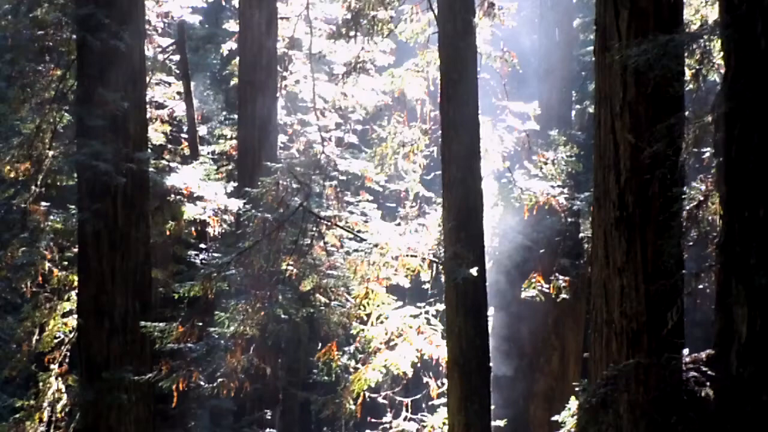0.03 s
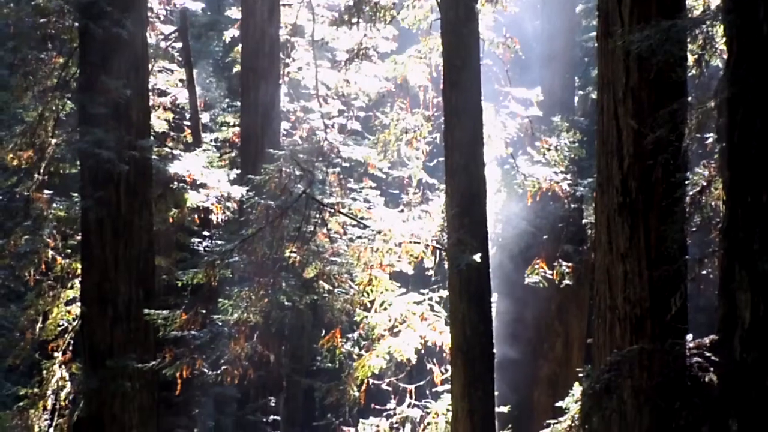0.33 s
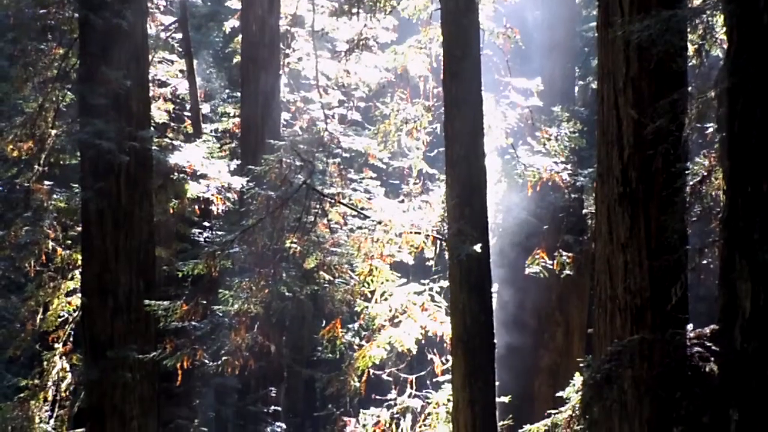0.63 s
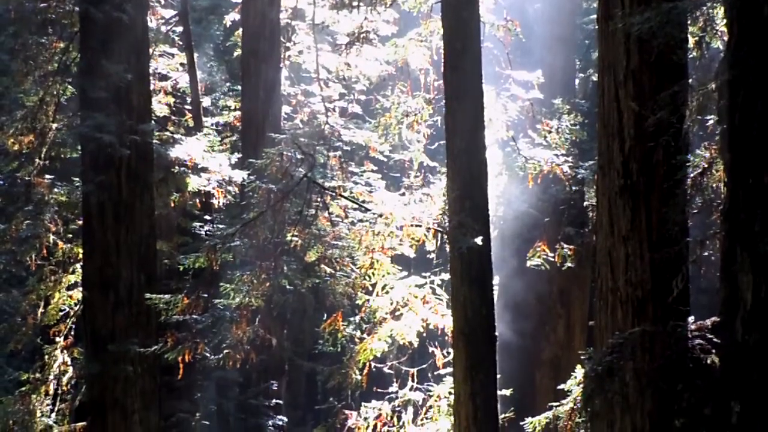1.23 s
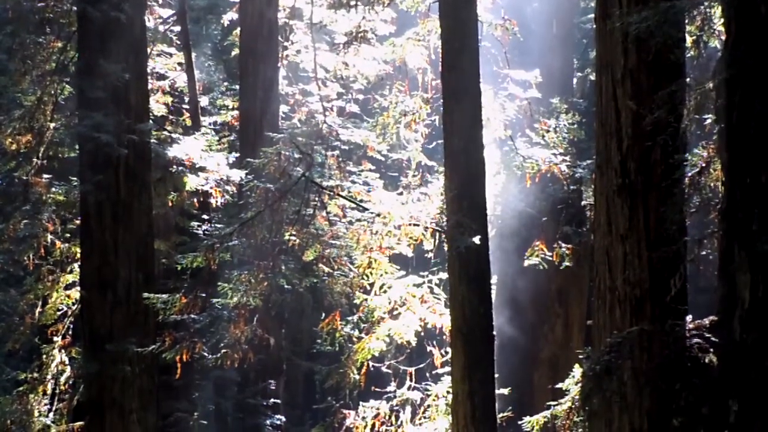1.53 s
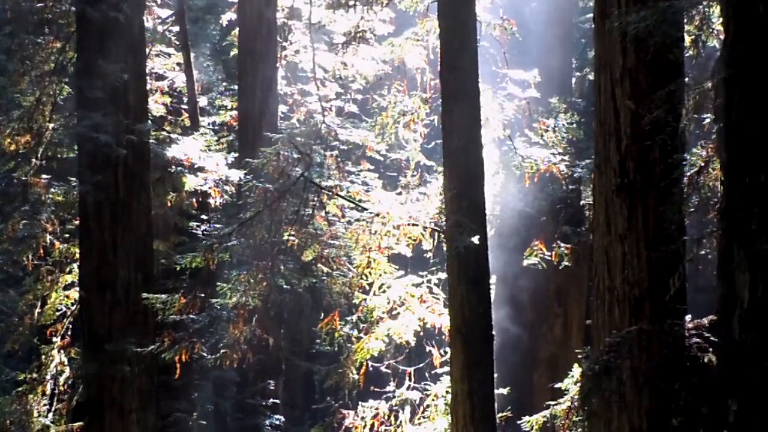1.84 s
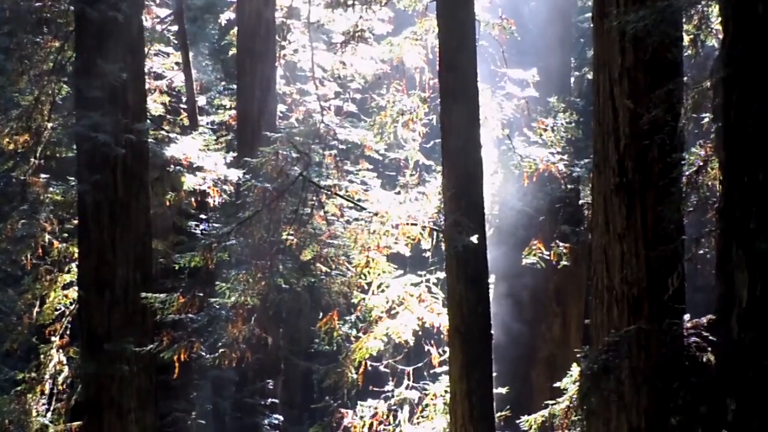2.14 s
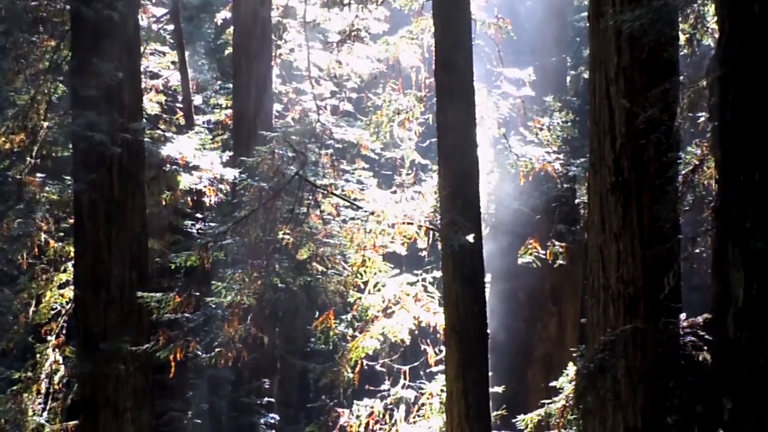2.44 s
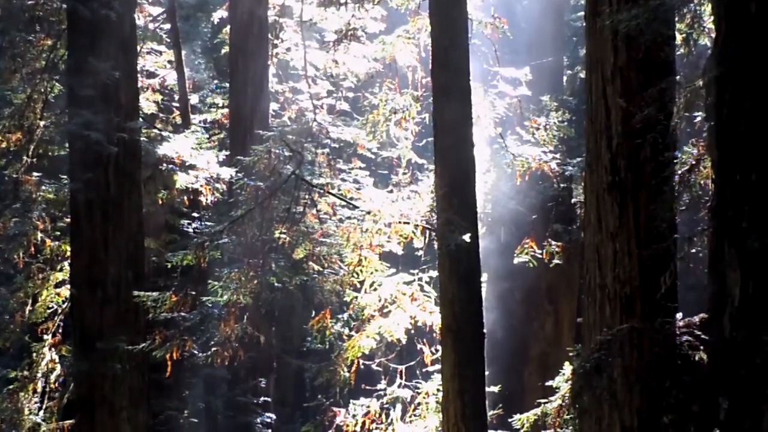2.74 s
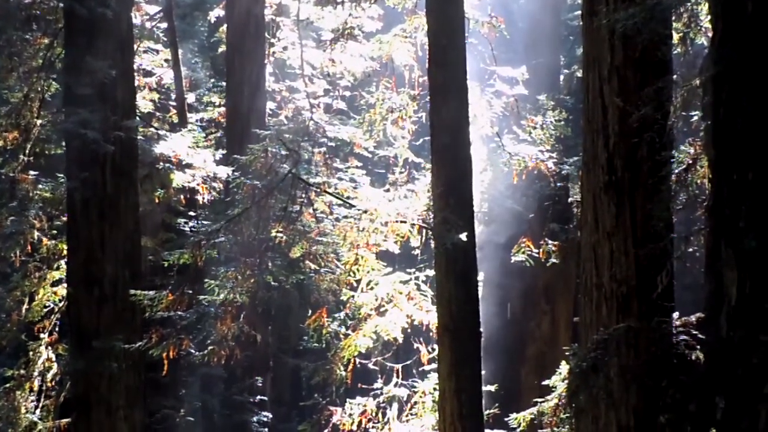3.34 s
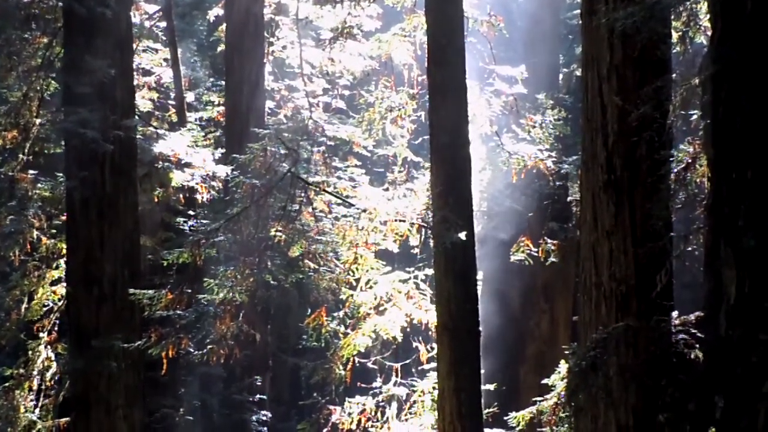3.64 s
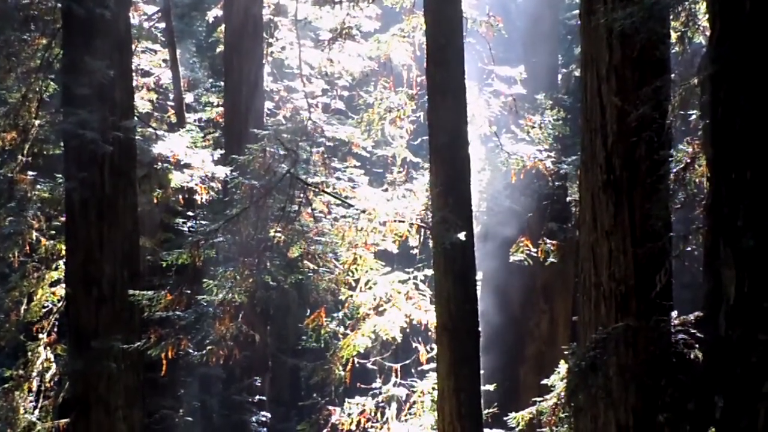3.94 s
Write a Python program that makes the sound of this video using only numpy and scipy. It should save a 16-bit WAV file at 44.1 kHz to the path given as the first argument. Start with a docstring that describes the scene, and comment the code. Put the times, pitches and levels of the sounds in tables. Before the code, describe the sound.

Sparse drops patter on leaves in a still forest, after one hollow knock close by.

```python
"""Water drips from tall trees onto leaves in a still forest.
After a moment of silence come a soft, far rush of air and a steady whirr, probably from a camera's housing.
At about 0.3 s one drop knocks on something hard and hollow right at the microphone.
Then drops tick and spatter on nearby leaves, thickest around 1 s and sparse near the end.
Fainter drips fall further off all the while."""
import sys
import numpy as np
from scipy import signal
from scipy.fft import rfft, irfft
from scipy.io import wavfile

SR = 44100
rng = np.random.default_rng(int(sys.argv[2]) if len(sys.argv) > 2 else 0)


def output_pcm(signal):
    """Save a mono or channel-first signal as 16-bit PCM at the path in sys.argv[1].

    Samples are clipped to [-1, 1] before scaling.
    """
    pcm = np.clip(np.atleast_2d(signal).T, -1, 1) * 32767
    wavfile.write(sys.argv[1], SR, np.round(pcm).astype(np.int16))


N = 176400


def undb(db):
    """Turn decibels into a number to multiply by."""
    return 10 ** (np.asarray(db) / 20)


def tone_curve(points, n):
    """Join (Hz, dB) points into a gain for every frequency in a sound of n samples."""
    hz, db = np.array(points, float).T
    return undb(np.interp(np.log(np.fft.rfftfreq(n, 1 / SR) + 1e-9), np.log(hz), db))


def shaped_noise(points, n):
    """Separate left and right noise, shaped by (Hz, dB) points, with a typical size of 1."""
    noise = irfft(rfft(rng.standard_normal((2, n))) * tone_curve(points, n), n)
    return noise / noise.std()


def sides(pan_db):
    """Left and right gains. Pan is how many dB louder the left is than the right."""
    return undb(np.array([[1], [-1]]) * pan_db / 2)


def waver(rate_hz):
    """A random wobble with a typical size of 1, mostly slower than the given rate."""
    slow = np.exp(-(np.fft.rfftfreq(N, 1 / SR) / rate_hz) ** 2)
    wobble = irfft(rfft(rng.standard_normal(N)) * slow, N)
    return wobble / wobble.std()


def add(out, start_s, sound):
    """Mix a sound into out at the given time."""
    i = int(np.clip(start_s * SR, 0, N - 1))
    out[:, i:i + sound.shape[1]] += sound[:, :N - i]


# The rush that both ears share. Each row: frequency in Hz, level in dB per Hz.
AIR_SHARED = [(15, -70.5), (31, -72.5), (50, -72), (95, -73.5), (160, -75), (300, -78.8), (420, -82),
              (800, -86.5), (1250, -89), (1650, -92), (2200, -93), (4000, -95.5), (6000, -97.5),
              (8300, -97), (10500, -99), (14000, -101.2)]
# The rush that is opposite in the two ears, for width. Each row: frequency in Hz, level in dB per Hz.
AIR_OPPOSITE = [(15, -106), (50, -85), (150, -88.5), (400, -89), (800, -91), (1600, -95), (4000, -98),
                (6500, -98.5), (8500, -95.5), (10500, -99.5), (14000, -102)]
# Which way the rush leans. Each row: frequency in Hz, pan in dB.
AIR_PAN = [(100, 0), (1200, -.5), (4000, -1.5), (6000, -1), (8200, -3), (9200, -2.5), (10200, 4),
           (12500, -0.5)]
# How the high hiss drifts. Each row: time in seconds, change of level in dB.
HISS_DRIFT = [(0, -2), (.7, -0.5), (1.4, -0.8), (2.1, -1.1), (2.6, -1), (4, -1.3)]


def air():
    """Far air rushes softly: the low part wavers a little and the high hiss drifts slowly."""
    shared, opposite = (rfft(rng.standard_normal(N)) * tone_curve(points, N) * np.sqrt(SR / 2)
                        for points in (AIR_SHARED, AIR_OPPOSITE))
    lean = np.sqrt(tone_curve(AIR_PAN, N))
    spectrum = np.array([(shared + opposite) * lean, (shared - opposite) / lean])
    treble = np.fft.rfftfreq(N, 1 / SR) > 3100
    drift_db = np.interp(np.arange(N) / SR, *np.array(HISS_DRIFT).T)
    hiss = irfft(spectrum * treble, N) * undb(drift_db)
    rush = irfft(spectrum * ~treble, N) * undb(.5 * waver(rate_hz=3.9))
    return rush + hiss


# The pitches in the whirr. Each row: pitch in Hz, width in Hz, typical level in dB, pan in dB,
# lag of the right side in radians.
WHIRR_BANDS = [(2316, 170, -69, -9, 0.7), (2569, 244, -57.5, -5.5, 1.68), (2853, 160, -62, 0, 1.33),
               (3203, 336, -58.5, 2, 1.02), (3476, 150, -65.5, -0.5, 1.6), (5080, 300, -67, -0.5, 3.5),
               (7800, 160, -70, 0, 4), (7880, 8, -73.5, -9, 2.8), (7897, 8, -70.5, -2.5, 2.8),
               (29.9, 9.9, -57.5, -2, 0)]


def whirr():
    """A faint machine whirr: narrow bands of noise, one of them a low rumble, each fluttering in level."""
    freqs, out = np.fft.rfftfreq(N, 1 / SR), 0
    for hz, width, level_db, pan_db, lag in WHIRR_BANDS:
        spectrum = rfft(rng.standard_normal(N)) / (1 + ((freqs - hz) / width * 2) ** 4) ** .5
        band = irfft(spectrum * np.exp(-1j * np.array([[0], [lag]])), N)
        flutter_db = 1.36 * waver(rate_hz=19)
        out = out + band / band.std() * undb(level_db + flutter_db) * sides(pan_db)
    return out


# The tone of a splash. Each row: frequency as a multiple of the tick's pitch, relative level in dB.
SPLASH_TONE = [(.05, -14), (.2, -17), (.45, 1), (.62, -8), (.8, 5), (1.08, 0.5), (1.3, -5), (1.8, -16),
               (3, -16)]


def drip(level_db, hz, splash_ms, pan_db):
    """A drop hits a leaf: a tiny tick, a short splash and a faint scatter off the leaves around it."""
    t = np.arange(SR // 16) / SR
    tick_s, splash_s, scatter_s = .00028, splash_ms * 1e-3, .011  # times to fade to about a third
    tick = np.sin(2 * np.pi * hz * t) * np.exp(-t / tick_s)
    # A longer splash starts softer, so its energy stays the same.
    splash_fade = undb(-.5) * np.sqrt(2 * tick_s / splash_s) * np.exp(-t / splash_s)
    scatter_fade = undb(-25) * np.exp(-t / scatter_s)
    spray = shaped_noise([(multiple * hz, db) for multiple, db in SPLASH_TONE], len(t))
    return undb(level_db) * sides(pan_db) * (tick + np.hypot(splash_fade, scatter_fade) * spray)


def far_drips(per_second=29):
    """Drops land further off, faintly and at random times."""
    out = np.zeros((2, N))
    for when, size, pitch, side in rng.random((int(per_second * N / SR), 4)):
        drop = drip(level_db=-49 + 6 * (2 * size - 1), hz=5000 + 5000 * pitch,
                    splash_ms=1.5, pan_db=4 * (2 * side - 1))
        add(out, when * N / SR, drop)
    return out


# Drops on nearby leaves. Each row: start in seconds, level in dB, pitch of the tick in Hz,
# fade time of the splash in milliseconds, pan in dB.
NEAR_DRIPS = [(.4182, -41, 5500, .8, -1), (.6352, -42, 7500, .8, 1), (0.8002, -25.5, 8400, 0.54, -4),
              (0.8172, -29.3, 6900, .8, -4), (.8384, -41, 8400, 1.2, -1), (.9628, -48, 8000, 1.2, -1),
              (0.986, -43, 6000, 1.2, -3), (1.0221, -40, 9000, 1.5, -1.5), (1.0292, -40, 6000, 2.5, -4),
              (1.035, -33.5, 8500, 4.3, -1), (1.0417, -42, 8800, 2.5, 0), (1.0445, -37, 9300, 3.3, 0),
              (1.0535, -42, 9800, 2.5, 2), (1.2058, -46, 9500, .9, 0), (1.3121, -45, 9000, 1.2, 0),
              (1.322, -37.5, 9200, 1.5, 1), (1.4880, -35, 8800, 1.1, -4), (1.4944, -43, 6500, 1.2, 1),
              (1.5191, -41, 8000, .9, 4), (1.7651, -41, 6500, 1.6, -2), (1.8516, -36, 6940, 1.6, -9),
              (1.937, -43.5, 10000, 1.2, 0), (2.019, -36.3, 10000, 0.87, -7), (2.056, -34.5, 9600, 1.8, 0),
              (2.0856, -42, 7800, 1.5, 0), (2.1811, -29, 9600, 1.1, -2.5), (2.1885, -37, 7400, 2.5, -2.5),
              (2.2112, -42, 4500, 1.2, 0), (2.4104, -37, 9400, .7, -8), (2.6384, -44, 8000, .9, 0),
              (2.7043, -45, 8000, .7, 0), (2.8092, -37.5, 7040, .5, -1), (3.2968, -36.5, 8460, 0.77, -1),
              (3.4352, -42, 7000, .7, -1.5), (3.4843, -51, 7500, .8, 0), (3.7947, -40, 8000, 1.4, 0)]


def near_drips():
    """Drops from the trees hit leaves close by, alone or in quick bunches."""
    out = np.zeros((2, N))
    for start_s, level_db, hz, splash_ms, pan_db in NEAR_DRIPS:
        add(out, start_s, drip(level_db, hz, splash_ms, pan_db))
    return out


# The notes a hollow shell rings with. Each row: pitch in Hz, relative level in dB,
# seconds to fade by 60 dB, pan in dB, lag of the right side in radians.
SHELL_NOTES = [(310, -43, 0.023, 10, 0), (560, -31, 0.019, 5.5, 0), (910, -40, 0.051, 9, 0),
               (1460, -41, 0.032, -18, 0.57), (2050, -29, 0.03, -7, 0.47), (2520, -34.5, .016, -2, 0.34),
               (2650, -21.5, 0.022, -9.5, 0.36), (2960, -28, 0.019, 0, .6), (4230, -31, 0.021, -7, 0.43),
               (4530, -30, 0.018, 7, .3), (6400, -28, 0.011, 8, 0.28), (7000, -30, 0.012, 3, .5),
               (7530, -30, .009, 0, .5), (8900, -28, 0.012, 8, .6)]
# The tone of the wet crack. Each row: frequency in Hz, relative level in dB.
CRACK_TONE = [(300, -13), (1200, -7), (2600, -14), (3600, -18), (5300, -5), (6500, 2), (9500, 0),
              (11500, -8.5), (15000, -15)]


def knock(start_s=.2863):
    """A drop hits a hard, hollow shell: a brief impact, a wet crack and a ring that dies quickly."""
    t, out = np.arange(SR // 10) / SR, np.zeros((2, N))
    rise_s, impact_s, crack_s = .00035, .00188, .0028
    ring = 0
    for hz, level_db, fade_s, pan_db, lag in SHELL_NOTES:
        note = np.sin(2 * np.pi * hz * t - np.array([[0], [lag]]))
        ring = ring + undb(level_db) * sides(pan_db) * note * np.exp(-np.log(1000) * t / fade_s)
    # The impact is a few strong vibrations while the drop flattens.
    push = np.sin(np.pi * np.minimum(t / impact_s, 1))
    impact = undb(-18.5) * sides(pan_db=-2) * np.sin(2 * np.pi * 2676 * t) * push
    crack = undb(-24) * shaped_noise(CRACK_TONE, len(t)) * np.exp(-t / crack_s)
    rise = 1 - np.exp(-t / rise_s)
    add(out, start_s, undb(.5) * (ring + impact + crack) * rise)
    return out


def scene():
    """Air and whirr lie under the knock and the drips."""
    return air() + whirr() + knock() + near_drips() + far_drips()


def record(dry):
    """The sound switches on after a moment of silence, and the highest treble is cut off steeply."""
    start_s, top_hz = .1055, 14300
    switched_on = np.arange(N) / SR >= start_s
    treble_cut = signal.ellip(10, .1, 70, top_hz, fs=SR, output="sos")
    return signal.sosfilt(treble_cut, dry * switched_on)


dry = scene()
out = record(dry)
output_pcm(out)
```